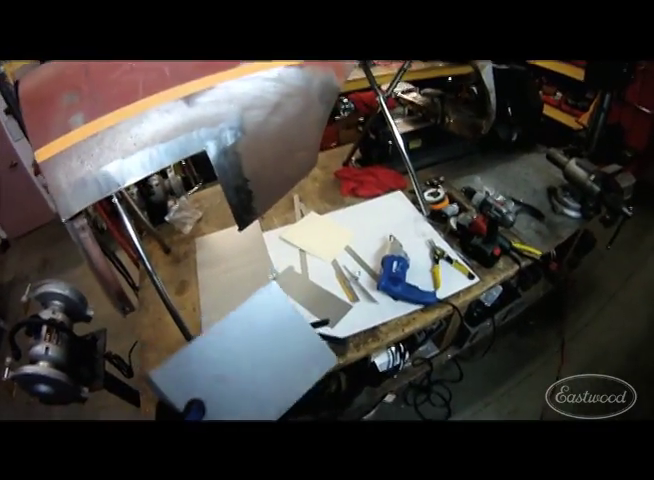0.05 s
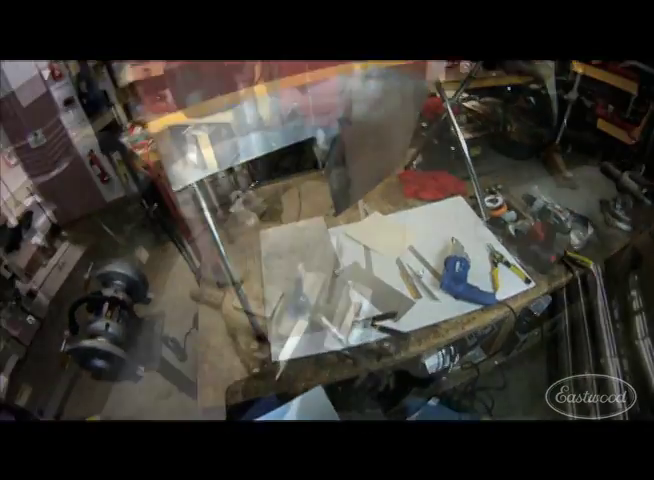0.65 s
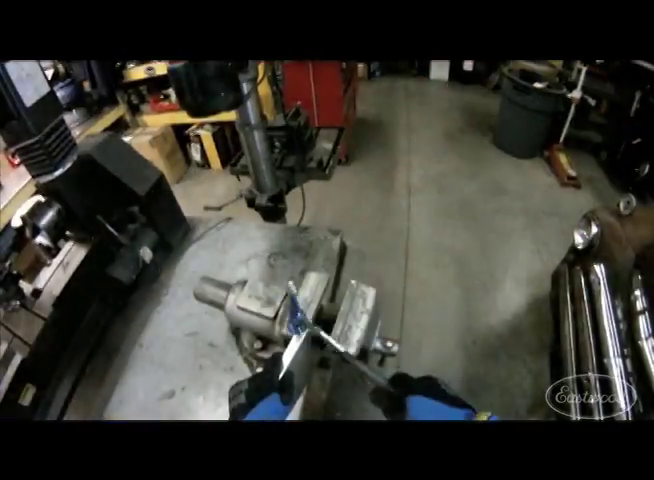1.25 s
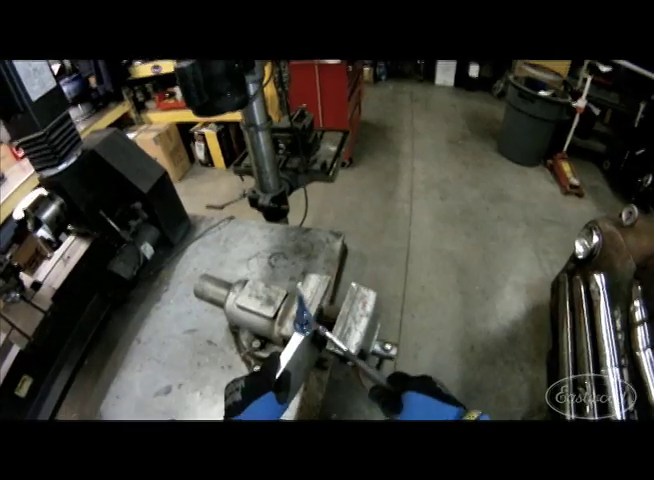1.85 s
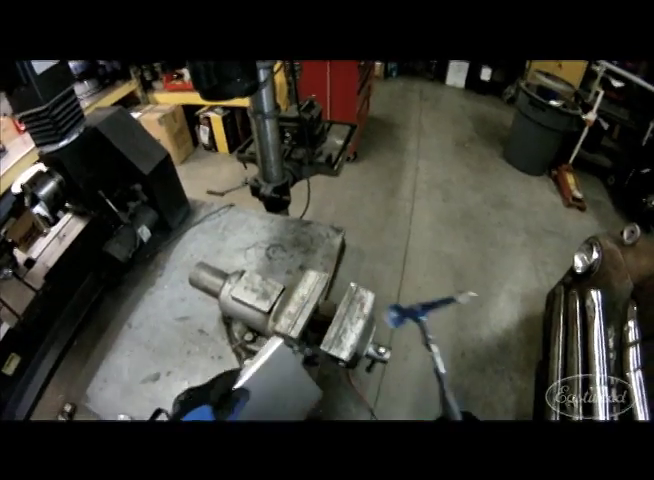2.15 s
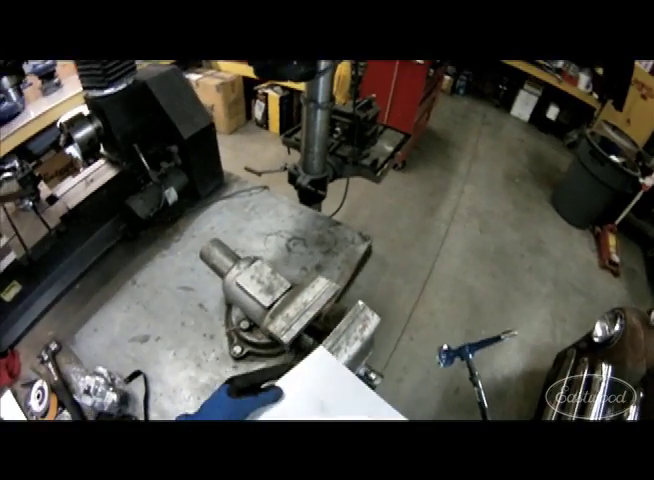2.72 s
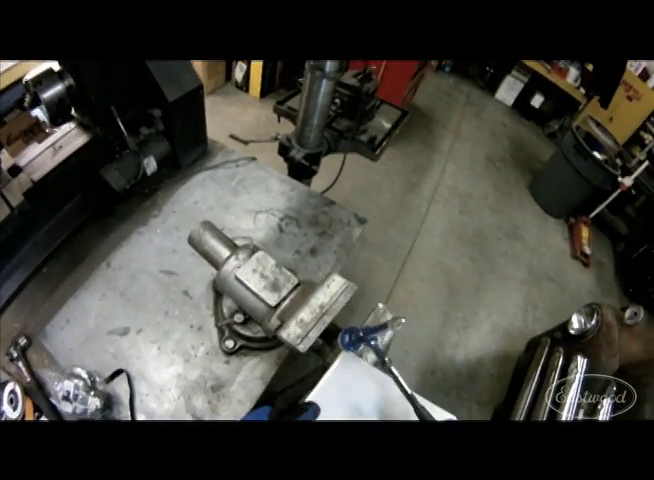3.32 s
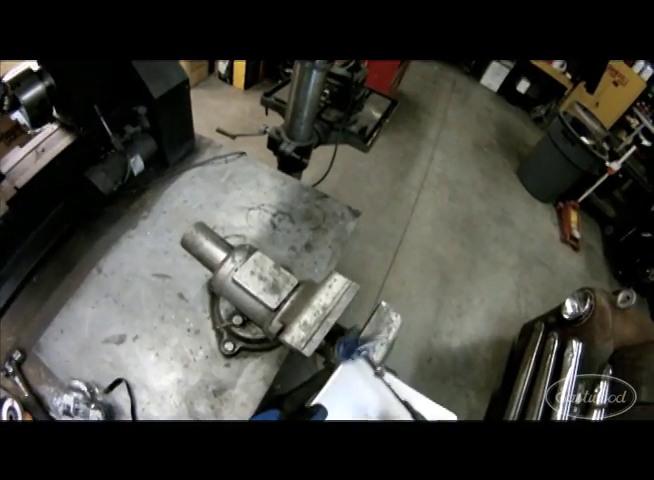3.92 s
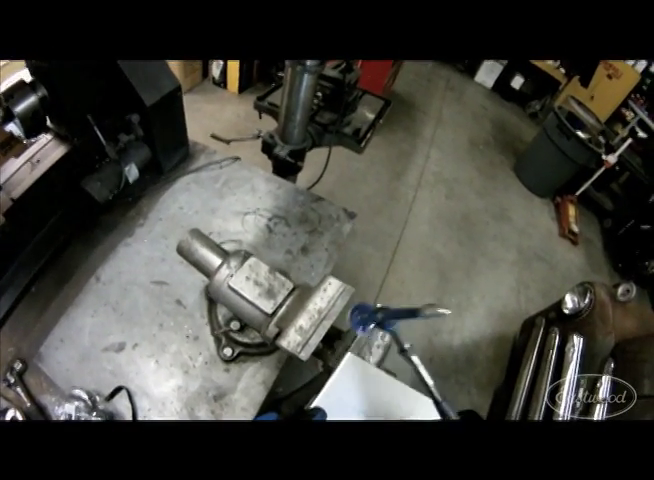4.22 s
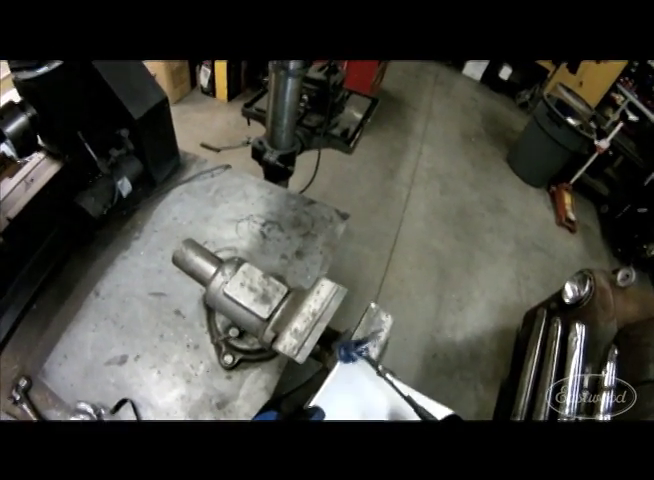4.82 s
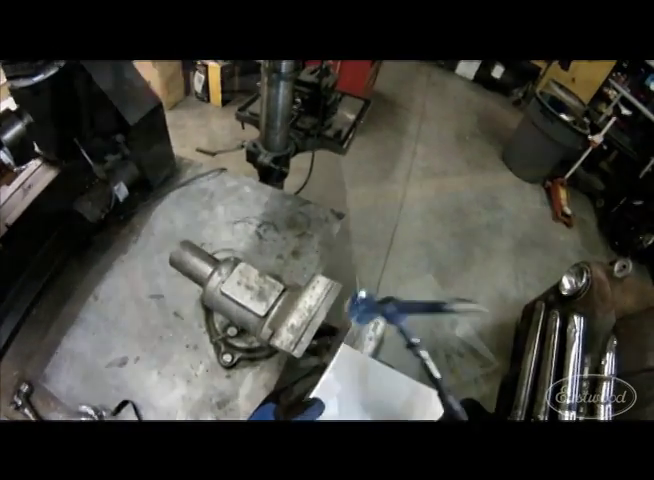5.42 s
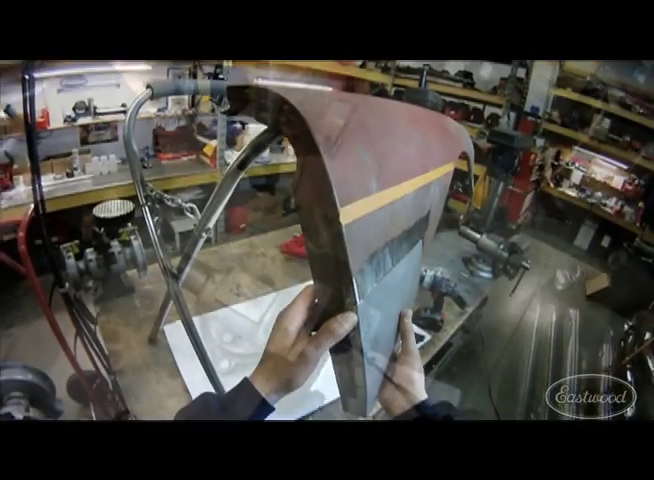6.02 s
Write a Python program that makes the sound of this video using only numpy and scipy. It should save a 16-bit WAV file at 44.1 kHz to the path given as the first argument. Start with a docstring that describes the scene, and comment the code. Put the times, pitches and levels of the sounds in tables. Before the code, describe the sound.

Squealing metal scrapes give way to two runs of sharp hammer blows on sheet steel, then a hollow panel bumps about.

```python
"""First you hear a steel sheet scrape and squeal over a workbench in short pushes, while a motor hums.
Its edge is hammered over the jaw of a vise, turned with a few light taps, and hammered again: the sheet
clangs and the vise thuds. The blows overload the microphone, so an automatic volume control ducks, then
lets the workshop's echo swell back. At the end a big hollow body panel is picked up and bumps about."""
import sys
import numpy as np
from scipy import signal
from scipy.fft import rfft, irfft
from scipy.io import wavfile

SR = 44100
rng = np.random.default_rng(int(sys.argv[2]) if len(sys.argv) > 2 else 0)


def store_pcm(level_fs):
    """Save levels as 16-bit WAV."""
    pcm = np.round(np.clip(level_fs, -1, 1) * 32767).astype(np.int16)
    wavfile.write(sys.argv[1], SR, np.atleast_2d(pcm).T)


N = 267246
TIME = np.arange(N) / SR
AGE = TIME[:SR // 2]   # seconds since a contact
HAMMERING_FROM_S = .8175   # the work at the vise is heard from here on, so only the tail of the first blow is heard


def from_db(db):
    return 10 ** (np.asarray(db) / 20)


def rms_one(x):
    return x / np.sqrt(np.mean(x ** 2) + 1e-20)


def at_hz(points, hz):
    """Look up a table's value at any frequency, on a scale of octaves."""
    table = np.array(points)
    return np.interp(np.log(np.maximum(hz, 1)), np.log(table[:, 0]), table[:, 1])


def dying(age, t60):
    """A fade from age 0 that loses 60 dB in t60 seconds: the "fade" of the tables."""
    return np.exp(-np.log(1000) * np.maximum(age, 0) / t60)


def coloured(x, spectrum, tilt_db=0):
    """Give noise a tone colour at a standard strength; tilt_db per octave brightens it."""
    hz = np.linspace(1, SR / 2, len(x) // 2 + 1)
    gain = from_db(at_hz(spectrum, hz) + tilt_db * np.log2(hz))
    return rms_one(irfft(rfft(x) * gain, len(x)))


def add(track, s, sound):
    """Mix a sound in, starting at s seconds."""
    start = min(max(round(s * SR), 0), N)
    track[start:start + len(sound)] += sound[:N - start]


def struck(tones, detune):
    """A hit sets an object's own tones ringing; the grip shifts their pitches a little each time."""
    age = TIME[:SR]
    out = 0
    for hz, db, t60 in tones:
        pitch = hz * (1 + detune * rng.normal())
        swing = np.cos(2 * np.pi * pitch * age) * rng.choice([-1, 1])
        out = out + from_db(db) * swing * dying(age, t60)
    return out


def clatter(spectrum, tilt_db, chatter_s, t60):
    """Thin steel's countless tones blur into noise that holds while the parts chatter, then fades."""
    crowd = coloured(rng.standard_normal(len(AGE)), spectrum, tilt_db)
    shape = dying(AGE - chatter_s, t60)
    burst = crowd * shape
    return burst * np.sqrt(np.sum(shape ** 2) / np.sum(burst ** 2))


# the motor's tones: f/Hz, level/dB
MOTOR_TONES = [(86.1, -62), (172.3, -61), (258.4, -66)]
# tone colour of the room's air: f/Hz, relative level/dB
AIR_COLOUR = [(25, -18), (85, 0.5), (130, -17.5), (200, -10), (265, -9.5), (400, -17.5), (600, -16.5),
              (1000, -21.5), (2500, -32.5), (5000, -34), (7500, -42), (11000, -44), (15000, -46.5)]
# tone colour of the handling rumble: f/Hz, relative level/dB
RUMBLE_COLOUR = [(20, -2), (40, -4.5), (110, -0.5), (200, -12.5), (500, -17.5), (2000, -66)]
# how the rumble rises and falls: t/s, level/dB
RUMBLE_LEVELS = [(0, -47.5), (.8, -45.5), (2.3, -68), (3.2, -57), (3.7, -69), (4.3, -58.5), (6.06, -50)]
def background():
    """A motor's wavering hum, the soft rush of room air and a low handling rumble, in stereo."""
    hum = 0
    for hz, db in MOTOR_TONES:
        waver = coloured(rng.standard_normal(N), [(3, 0), (12, -18), (40, -60), (200, -120)])
        hum = hum + from_db(db) * np.sqrt(2) * np.sin(2 * np.pi * hz * TIME + .45 * waver)
    air = from_db(-59.5) * coloured(rng.standard_normal(N), AIR_COLOUR)
    mid, side = (coloured(white, RUMBLE_COLOUR) for white in rng.standard_normal((2, N)))
    rumble = mid + from_db(-21) * side * np.array([[1], [-1]])   # left and right differ slightly
    rumble_db = np.interp(TIME, *np.transpose(RUMBLE_LEVELS))
    return hum + air + from_db(rumble_db) * rumble


# tone colour of the workshop's echo: f/Hz, relative level/dB
ROOM_COLOUR = [(100, -1), (1000, -1), (14000, -1.5)]
# how long the echo lasts: f/Hz, fade/s
ROOM_FADES = [(100, 0.86), (500, 0.43), (1200, 0.64), (3000, 0.89), (8000, 0.84), (14000, .68)]
def workshop_echo(colour=ROOM_COLOUR, tilt_db=0, build_s=0.0038):
    """The room's answer to a click: reflections pile up, then each band of pitches fades at its own rate."""
    age = TIME[:3 * SR // 2]
    hz = np.linspace(0, SR / 2, len(age) // 2 + 1)
    octaves = np.log2(np.maximum(hz, 1) / 2500)
    spectrum = rfft(rng.standard_normal(len(age))) * from_db(at_hz(colour, hz) + tilt_db * octaves)
    edges = np.geomspace(80, SR / 2, 21)
    echo = 0
    for low, high in zip(edges, edges[1:]):
        band = irfft(spectrum * (hz >= low) * (hz < high), len(age))
        echo = echo + band * dying(age, at_hz(ROOM_FADES, np.sqrt(low * high)))
    return echo * (1 - np.exp(-age / build_s))


def stroke(s, length_s, attack_s, release_t60_s, sag_db_per_s=19):
    """Speed of one slide: it picks up, slows under friction and dies when the hand stops."""
    age = TIME - s
    rise = np.clip(age / attack_s, 0, 1)
    sag = from_db(-sag_db_per_s * np.maximum(age, 0))
    return rise * sag * dying(age - length_s, release_t60_s)


# tone colour of a glove rubbing on steel: f/Hz, relative level/dB
RUB_COLOUR = [(100, -21.5), (180, -8), (300, 5), (480, -14.5), (1200, -23.5), (3500, -19.5), (6000, -9),
              (8000, -20), (11000, -34), (15000, -42)]
def glove_rub():
    """The sheet shifts softly in the glove: a dull rub under a thin hiss."""
    speed = stroke(s=2.82, length_s=0.44, attack_s=0.21, release_t60_s=.7)
    return from_db(-55.5) * speed * coloured(rng.standard_normal(N), RUB_COLOUR)


# tone colour of the panel's hollow rattle: f/Hz, relative level/dB
HOLLOW_COLOUR = [(50, -1.5), (150, -17), (350, -5.5), (620, -6.5), (800, -3), (1000, -5), (1250, -6),
                 (1900, -15.5), (3000, -18), (5000, -38), (10000, -27), (12000, -14.5), (15000, -37)]
# the panel's ringing tones: f/Hz, relative level/dB, fade/s
PANEL_TONES = [(651, 0, .1), (807, 0, .75), (942, -15, .4), (1125, -13, .5), (1230, -13, .3),
               (1674, -16, .4), (2218, -19, .4)]
# the panel's bumps: t/s, level/dB, brightness/(dB per octave), ring compared with the bump/dB
BUMPS = [(5.8231, -30, 1, 5), (5.9208, -24, 1.5, -13), (6.0331, -22, 0.5, -5)]
def panel_bumps(room):
    """At each bump the big panel knocks, shudders on and is left singing."""
    rattle, ring = np.zeros((2, N))
    for s, db, tilt_db, ring_db in BUMPS:
        knock = clatter(HOLLOW_COLOUR, tilt_db, chatter_s=.004, t60=.05)
        shudder = clatter(HOLLOW_COLOUR, tilt_db, chatter_s=.015, t60=.22)
        add(rattle, s, from_db(db) * (knock + shudder))
        add(ring, s, from_db(db + ring_db) * struck(PANEL_TONES, detune=.008))
    return rattle + ring + from_db(-6) * signal.fftconvolve(rattle, room)[:N]


# tone colour of steel scraping the bench: f/Hz, relative level/dB
RASP_COLOUR = [(240, -47), (400, -20.5), (873, -1.5), (2190, -7.5), (3410, -4), (5230, -9.5), (6000, -6),
               (8800, -12.5), (11900, -16), (13100, -19), (15500, -20.5)]
# the dragged edge's squealing tones: f/Hz, width/Hz, relative level/dB
SQUEAL_TONES = [(848, 60, 0.5), (1676, 16, -4.5), (3850, 350, -5), (5140, 360, -10.5), (6640, 110, -13.5),
                (8300, 150, -8)]
# pushes of the sheet: t/s, length/s, level/dB, squeal compared with rasp/dB
PUSHES = [(-0.008, 0.051, -26, 4.5), (0.051, 0.11, -43, -10.5), (0.151, .26, -34.5, -13.5),
          (0.417, .065, -37.5, -14), (0.476, .046, -28.5, -8.5), (0.631, 0.043, -27, -6),
          (0.745, 0.057, -39.5, -7.5)]
def sheet_slide(room, slips_per_s, spread_db):
    """The edge moves in tiny slips that rasp on the bench and, where it grips, make it squeal."""
    sizes = from_db(spread_db * np.minimum(rng.exponential(1, N), 4)) * rng.choice([-1, 1], N)
    slips = sizes * (rng.random(N) < slips_per_s / SR)
    # the contact travels along the edge, so each spot's rasp blends into the next
    spot_times = np.linspace(0, HAMMERING_FROM_S, 9)
    rasp = np.zeros(N)
    for s in spot_times:
        share = np.sqrt(np.maximum(1 - np.abs(TIME[:SR] - s) / spot_times[1], 0))
        tick = clatter(RASP_COLOUR, tilt_db=0, chatter_s=0, t60=0.023)
        add(rasp, 0, share * rms_one(signal.fftconvolve(slips[:SR], tick)[:SR]))
    squeal = rms_one(sum(from_db(db) * signal.lfilter(*signal.iirpeak(hz, hz / width, fs=SR), slips)
                         for hz, width, db in SQUEAL_TONES))
    out = np.zeros(N)
    for s, length_s, db, squeal_db in PUSHES:
        speed = stroke(s, length_s, attack_s=0.016, release_t60_s=0.062)
        grip = from_db(squeal_db)
        out += from_db(db) * speed * (rasp + grip * squeal) / np.sqrt(1 + grip ** 2)
    return out + from_db(-16.5) * signal.fftconvolve(out, room)[:N]


# tone colour of steel hitting steel: f/Hz, relative level/dB
CLANG_COLOUR = [(20, -46.5), (60, -25.5), (150, -6), (300, -6), (450, 2), (800, -1), (1050, -3.5),
                (1600, -5), (2500, -2.5), (3500, -10), (5000, -12.5), (9000, -15.5), (11000, -19),
                (15000, -25.5)]
# the sheet's ringing tones: f/Hz, relative level/dB, fade/s
SHEET_TONES = [(1254, -32, .25), (1701, -16, .29), (2062, -14, .08), (2430, -9, .08), (2820, -27, .35),
               (3066, -22, .25), (3385, -29, .4), (4190, -30, .6), (7831, -35, .45), (10300, -41, .4)]
# the low tones of the vise on its stand: f/Hz, relative level/dB, fade/s
VISE_TONES = [(115.2, -24.5, 0.22), (154, -39.5, 0.94), (234, -29, 0.31), (403, -23, 0.05)]
def hit_on_vise(db, tilt_db, chatter_s, ring_db, thud_db, sheet_detune, vise_detune):
    """Steel meets steel with a clang; the gloved sheet rings briefly and the vise thuds."""
    clang = from_db(db) * clatter(CLANG_COLOUR, tilt_db, chatter_s, t60=.07)
    ring = from_db(ring_db) * struck(SHEET_TONES, sheet_detune)
    thud = from_db(thud_db) * struck(VISE_TONES, vise_detune)
    return np.pad(clang, (0, len(ring) - len(clang))) + ring + thud


# taps on the vise: t/s, clang level/dB, brightness/(dB per octave), ring/dB, thud/dB, knock f/Hz, knock/dB
TAPS = [(2.6225, -42, .3, -55, -30, 600, -50), (2.645, -47, 0, -55, -36, 400, -47),
        (2.675, -38, -.3, -43, -28, 870, -30), (2.898, -51, -.2, -64, -44, 430, -50),
        (3.469, -40, 0, -35, -17, 540, -36)]
def light_taps(room):
    """The sheet is laid on the jaw and the hammer is set down on it to aim."""
    out = np.zeros(N)
    for s, db, tilt_db, ring_db, thud_db, knock_hz, knock_db in TAPS:
        add(out, s, hit_on_vise(db, tilt_db, chatter_s=.003, ring_db=ring_db, thud_db=thud_db,
                                sheet_detune=0.00394, vise_detune=0.0066))
        knock = np.sin(2 * np.pi * knock_hz * AGE) * dying(AGE, t60=.05)
        add(out, s, from_db(knock_db) * knock)
    return out + from_db(-8) * signal.fftconvolve(out, room)[:N]


# tone colour of a hammer blow's echo: f/Hz, relative level/dB
BLOW_ECHO_COLOUR = [(100, -4), (250, -7.5), (500, 3.5), (900, 1), (1300, -2), (2000, -1), (3200, -2),
                    (5000, -4), (8000, -6), (11000, -14), (14500, -13.5)]
def blow_echo(tilt_db, ripple_db):
    """Each blow lands on another spot of the sheet, so other tones stand out in its echo."""
    hz = np.arange(60, 16000, 90)
    levels_db = at_hz(BLOW_ECHO_COLOUR, hz) + ripple_db * rng.standard_normal(len(hz))
    return workshop_echo(np.column_stack([hz, levels_db]), tilt_db)


# thin, high tones of the steel that hang on after a blow: f/Hz, relative level/dB, fade/s
OVERTONES = [(3115, -30.5, 0.89), (3220, -32.5, 1), (3474, -31, 0.7), (4190, -28.5, 0.81), (4260, -33, .8),
             (4760, -33, .8), (5168, -32.5, 1), (6850, -35, 1), (6800, -36.5, 0.3), (7815, -34, .8),
             (8700, -35, .7), (8935, -35, 1), (9900, -36, 1)]
# hammer blows: t/s, clang level/dB, chatter/s, brightness/(dB per octave),
# boost of the tail (overtones and echo)/dB, ring/dB, thud/dB
BLOWS = [(0.792, -5.5, 0.0097, 1.3, 6.5, -8, -5), (1.1013, -5, 0.015, 2.35, 5, -1.5, 0.5),
         (1.4203, -5, 0.015, 2.5, 6, -5.5, -1.5), (1.7306, -4, 0.015, 3.5, 6, -28, 0),
         (3.9406, -4.5, 0.0041, 0.5, -1.5, -6, 0), (4.3598, 0.5, 0.0014, 0.5, -1.5, -12, 7),
         (4.7647, 0.5, 0.0056, 0.5, -0.5, 1.5, -4.5), (5.1489, 0, 0.0056, 1.5, 0, 5, 4.5),
         (5.5349, 1, 0.0047, 1, 0.5, -18, 7.5)]
def hammering():
    """The hammer slaps the sheet against the jaw; high tones linger and the room answers."""
    out = np.zeros(N)
    for s, db, chatter_s, tilt_db, tail_db, ring_db, thud_db in BLOWS:
        add(out, s, hit_on_vise(db, tilt_db, chatter_s, ring_db, thud_db,
                                sheet_detune=0.0044, vise_detune=0.019))
        add(out, s, from_db(db + tail_db - 2) * struck(OVERTONES, detune=.0015))
        add(out, s, from_db(db + tail_db - 10) * blow_echo(0.22 * tilt_db, ripple_db=3))
    return out


def volume_control(x, threshold_db, range_db, attack_s, release_db_per_s, sense_s):
    """The volume drops a few milliseconds after a loud sound and climbs back steadily."""
    def lag(v, seconds):
        memory = np.exp(-1 / (seconds * SR))
        return signal.lfilter([1 - memory], [1, -memory], v)
    level_db = 10 * np.log10(lag(x ** 2, sense_s) + 1e-12)
    excess_db = np.clip(level_db - threshold_db, 0, range_db)
    recovery_db = release_db_per_s * TIME
    cut_db = np.maximum.accumulate(excess_db + recovery_db) - recovery_db
    return x * from_db(-lag(lag(cut_db, attack_s), attack_s))


def scene():
    """The slide on the bench, the work at the vise and the lifted panel follow each other in one room."""
    room = workshop_echo()
    room = room / np.sqrt(np.sum(room ** 2))
    vise = volume_control(hammering() + light_taps(room), threshold_db=-17, range_db=37,
                          attack_s=0.0031, release_db_per_s=94, sense_s=0.0033)
    bench = sheet_slide(room, slips_per_s=3600, spread_db=2.5)
    return vise * (TIME > HAMMERING_FROM_S) + bench + glove_rub() + panel_bumps(room) + background()


# pitches the microphone picks up weakly: f/Hz, width/Hz, level/dB
MIC_DIPS = [(5846, 910, -10.5), (6225, 920, -8), (11750, 4800, -28)]
def record(dry):
    """The microphone squashes loud peaks and dulls some treble; its input hisses and clips."""
    x = np.tanh(dry)
    for hz, width_hz, db in MIC_DIPS:
        width = np.tan(np.pi * width_hz / SR) * np.array([1, 0, -1])
        centre = np.array([1, -2 * np.cos(2 * np.pi * hz / SR), 1])
        x = signal.lfilter(centre + width * from_db(db), centre + width, x)
    hiss = from_db(-72.5) * rng.standard_normal(N)
    x = np.clip(x + hiss, -.58, .58)
    treble_cut = signal.cheby1(10, .05, 15500, fs=SR, output="sos")   # removes the top above 15500 Hz
    return signal.sosfiltfilt(treble_cut, x)


dry = scene()
out = record(dry)
store_pcm(out)
```